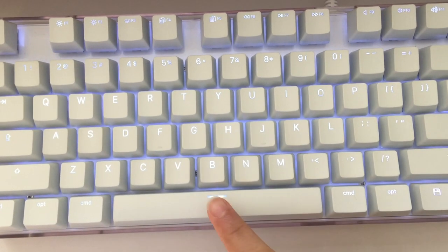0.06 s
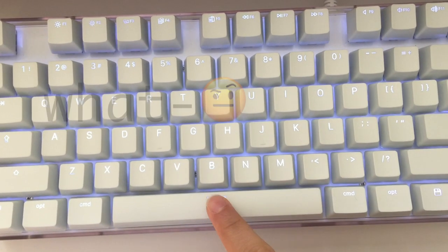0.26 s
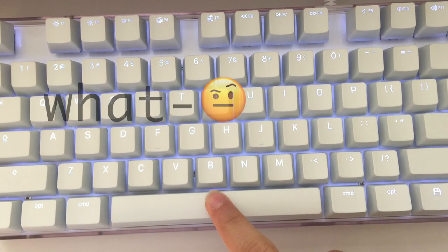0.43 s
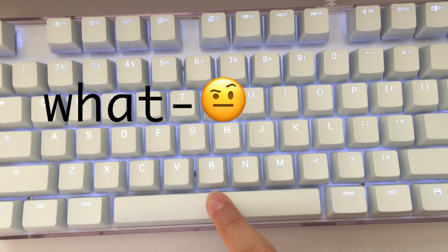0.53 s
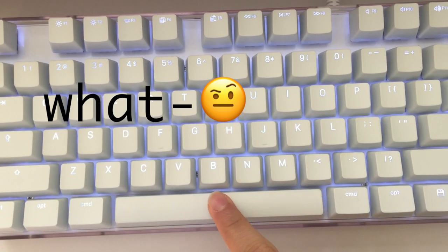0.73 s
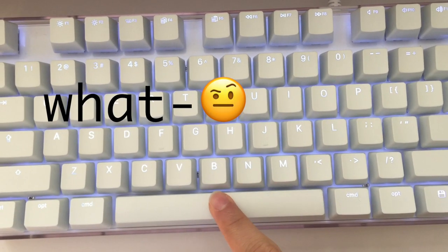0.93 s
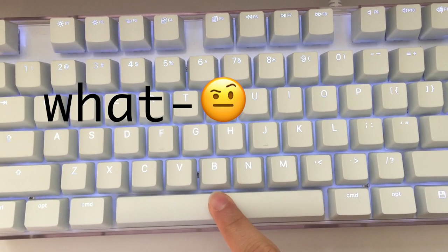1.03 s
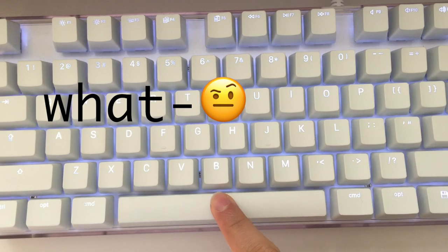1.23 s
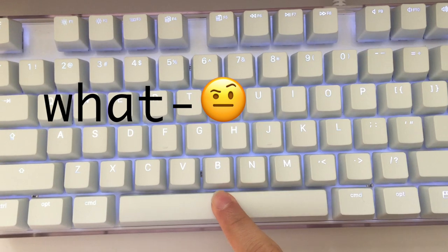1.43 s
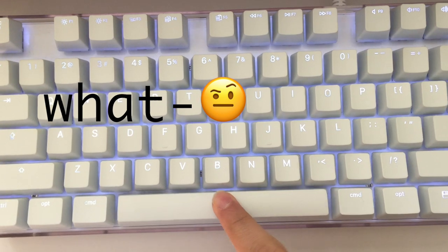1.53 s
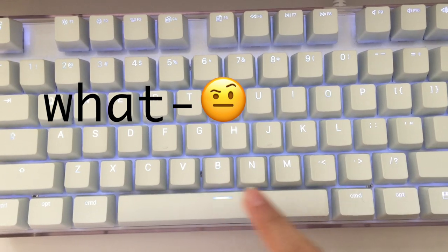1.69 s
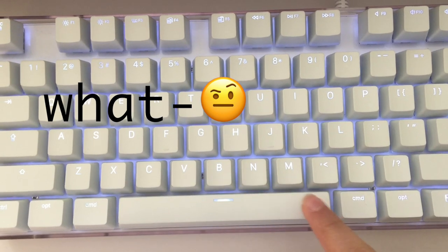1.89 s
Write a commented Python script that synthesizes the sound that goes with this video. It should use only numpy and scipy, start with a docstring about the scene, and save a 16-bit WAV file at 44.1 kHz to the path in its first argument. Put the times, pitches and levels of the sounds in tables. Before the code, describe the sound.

Soft plastic clacks of a mechanical spacebar pressed and released over and over, close by.

```python
"""A low room hum, then a light plastic rattle: close by, a finger taps a mechanical spacebar over and over.
Each tap rattles the loose cap, lands a low clack if the bar hits bottom, and springs back with a
brighter clack. Every hit is a burst of ringing plastic: damped noise bands plus the clear modes of
bar and case. The stem scrapes faintly as it travels, and the small room adds a short tail."""
import sys
import numpy as np
from scipy import signal
from scipy.fft import rfft, irfft
from scipy.io import wavfile

SR = 44100
rng = np.random.default_rng(int(sys.argv[2]) if len(sys.argv) > 2 else 0)


def unload_audio(sound):
    """Save the sound as a 16-bit wav file, at the path given as the first command line argument."""
    columns = np.transpose(np.atleast_2d(sound))
    # keep every value between -1 and 1, then stretch to whole-number steps
    steps = np.round(np.clip(columns, -1, 1) * 32767)
    wavfile.write(sys.argv[1], SR, steps.astype(np.int16))


N = 85995
T = np.arange(SR // 14) / SR  # time axis of one hit [s]
TOUCH, BOTTOM, RETURN = range(3)  # kinds of hit: each picks its level column in the resonance tables


def amp(db):
    """Decibels to gain."""
    return 10 ** (np.asarray(db) / 20)


def unit(x):
    """Scale to rms 1."""
    return x / np.sqrt(np.mean(x ** 2) + 1e-20)


def curve(points, hz):
    """Read (frequency, value) breakpoints on a log frequency axis."""
    freqs, values = np.transpose(points)
    return np.interp(np.log(hz + 1), np.log(freqs + 1), values)


def noise(gain, size):
    """Noise of rms 1, shaped by gain(hz)."""
    spectrum = rfft(rng.standard_normal(size))
    return unit(irfft(spectrum * gain(np.fft.rfftfreq(size, 1 / SR)), size))


def add(track, at, sound):
    """Drop a sound onto the track at a time in seconds."""
    part = track[max(round(at * SR), 0):][:len(sound)]
    part += sound[:len(part)]


def envelope(attack, hold, t60):
    """Rise, hold and exponential decay, all in seconds."""
    return (1 - np.exp(-(T / attack) ** 2)) * amp(-60 * np.maximum(T - hold, 0) / t60)


def tilt(brightness, hz):
    """Tilt EQ in dB, pivoting at 2 kHz; brightness is its slope in dB per octave."""
    return brightness * np.log2(np.clip(hz, 700, 8000) / 2000)


# Hum bands of the room: (centre [Hz], level [dB], width [Hz])
HUM_BANDS = [(55.7, -63.5, 5.9), (88.5, -76.5, 9.8), (137.9, -68.5, 3.85), (167.3, -69, 5)]
# Spectrum of the air bed: (frequency [Hz], relative level [dB])
AIR_SPECTRUM = [(15, -43), (28, -28), (38, -10), (48, 5.5), (70, -2.5), (90, -8.5), (115, -2.5),
                (150, -2.5), (200, -8.5), (270, -19.5), (500, -25.5), (900, -25.5), (1500, -25),
                (2600, -32.5), (5000, -36), (9000, -42), (14500, -43.5), (15500, -42)]
def room_tone():
    """The bed: narrow noise bands waver as a low hum over faint air."""
    hum = sum(amp(db) * noise(lambda f: 1 / (1 + (2 * (f - hz) / width) ** 4), N)
              for hz, db, width in HUM_BANDS)
    air = amp(-62.5) * noise(lambda f: amp(curve(AIR_SPECTRUM, f)), N)
    return hum + air


# Decay of the room's tail: (frequency [Hz], t60 [s])
TAIL_DECAY = [(200, 0.23), (1000, 0.28), (2500, 0.24), (6000, 0.15), (14000, 0.21)]
# Colour of the room's tail: (frequency [Hz], relative level [dB])
TAIL_COLOUR = [(200, 0.5), (700, 3), (1150, -2.5), (1700, -1), (2400, -1.5), (3200, -5), (6000, 3),
               (14000, -4.5)]
def room_reverb(source, tails):
    """Small-room reflections: the send crossfades through several short noise tails as the taps go on."""
    wet = np.zeros(N)
    for selector in np.eye(tails):
        hz, t, spectrum = signal.stft(rng.standard_normal(SR // 2), SR, nperseg=256)
        decay_db = 60 * t / curve(TAIL_DECAY, hz)[:, None]
        spectrum *= amp(curve(TAIL_COLOUR, hz)[:, None] - decay_db)
        tail = signal.istft(spectrum, SR, nperseg=256)[1]
        response = np.pad(tail / np.linalg.norm(tail), (SR // 200, 0))  # 5 ms pre-delay
        send = np.sqrt(np.interp(np.arange(N), np.linspace(0, N, tails), selector))
        wet += signal.fftconvolve(source * send, response)[:N]
    return wet


# Dense, damped resonances of the plastic:
# (centre [Hz], t60 [s], touch level [dB], bottom level [dB], return level [dB])
PLASTIC_BANDS = [(294, 0.041, -21, -25.5, -31), (410, 0.05, -20, -14.5, -17.5), (605, 0.041, -17, -16, -17),
                 (830, 0.047, -10.5, -12, -20.5), (1310, 0.051, -10.5, -8.5, -9.5),
                 (1827, 0.024, -5.5, -4, -5.5), (2480, 0.024, -5, -4.5, -5.5),
                 (3400, 0.015, -4.5, -11.5, -4), (4240, 0.016, -16.5, -13.5, -16),
                 (5930, 0.023, -23.5, -24, -21), (8240, 0.017, -25, -21.5, -22.5),
                 (14100, 0.014, -22, -22, -20.5)]
def plastic(shape, colour, kind):
    """Crowded resonances as noise bands, with the envelope shape(hz, t60) and the EQ colour(hz) in dB."""
    centres = [row[0] for row in PLASTIC_BANDS]
    out = np.zeros(len(T))
    for selector, (hz, t60, *levels) in zip(np.eye(len(centres)), PLASTIC_BANDS):
        env = shape(hz, t60)
        band = env * noise(lambda f: np.sqrt(np.interp(f, centres, selector, left=0)), len(T))
        out += unit(band) * np.sqrt(np.mean(env ** 2)) * amp(levels[kind] + colour(hz))
    return out


def scrape(length, growth_db, brightness=0):
    """A moment of friction on plastic, swelling or fading by growth_db over its length."""
    swell = amp(growth_db * np.minimum(T / length - 1, 0))
    return plastic(lambda hz, t60: swell * envelope(0.0014, length, t60),
                   lambda hz: tilt(brightness, hz), TOUCH)


# Clear modes of bar and case:
# (frequency [Hz], t60 [s], touch level [dB], bottom level [dB], return level [dB])
BAR_MODES = [(443, 0.14, -23, -23, -19.5), (513, 0.056, -15.5, -20, -28), (1089, 0.037, -13, -16.5, -23.5),
             (1304.3, 0.067, -10, -10, -14), (1645, 0.031, -12, -1, -6), (1774, 0.017, -43, -0.5, -1),
             (2082, 0.027, 0.5, -10.5, -6), (2577, 0.03, -46, -6.5, -6.5), (2974, 0.027, -19, -17, -9),
             (2993, 0.015, -4.5, -3, -1), (3482, 0.035, -10.5, -7.5, -5), (3724, 0.011, 0.5, -31.5, -4),
             (4464, 0.015, -11.5, -20, -17.5)]
def hit(kind, brightness, attack, hold, ring_db, snap_db=0):
    """One impact: a burst in the plastic, the ring of bar and case, and the stem's short ping."""
    def colour(hz):
        return tilt(brightness, hz) + snap_db / (1 + (4630 / hz) ** 4)  # snap is a high shelf

    def burst(hz, t60):
        lag = 0.0017 * 1000 / hz  # low resonances build up later
        return envelope(attack + lag, hold + lag, t60)

    out = plastic(burst, colour, kind)
    modes = [(hz, t60, levels[kind] + ring_db) for hz, t60, *levels in BAR_MODES]
    stem_ping = (6916, 0.016, -18.5)
    for hz, t60, db in modes + [stem_ping]:
        cycles = hz * (1 + rng.normal(0, 0.0069)) * T + rng.random()  # slight detune on every hit
        gain = amp(db + colour(hz) + rng.normal(0, 1.9))
        out += gain * envelope(attack, hold, t60) * np.sin(2 * np.pi * cycles)
    return out


# Cap ticks under the finger: (time [s], level before cushioning [dB], brightness [dB/octave])
CAP_TICKS = [(0.203, -50.5, -1), (0.2091, -42, -3), (0.218, -42.5, 2.5), (0.3175, -39, 1), (.324, -42.5, 1),
             (.330, -43, -5), (.5035, -40.5, 6), (.506, -32.5, 0), (0.512, -43, -6), (0.581, -48, -3),
             (0.691, -47.5, 1.5), (0.6963, -39.5, 2.5), (0.8638, -57, 6), (0.871, -41, 0.5),
             (.876, -40.5, -1), (1.049, -38, 2.5), (1.053, -40.5, -5), (1.221, -42, -1), (1.230, -46.5, 1),
             (1.286, -51.5, -4), (1.414, -39, 2.5), (1.418, -39.5, 3.5), (1.423, -42.5, 4.5),
             (1.483, -49, -2), (1.6241, -43.5, 2), (1.6276, -36.5, 2), (1.631, -38, -0.5)]
def cap_rattle():
    """Skin brushes the loose cap, it ticks against stem and stabiliser, and the stem scrapes down."""
    brush_s, sink_s, firm_db = 0.012, 0.031, -35.5
    out = np.zeros(N)
    for at, db, brightness in CAP_TICKS:
        add(out, at - brush_s, amp(db - 15.5) * scrape(brush_s, growth_db=12, brightness=2.5))
        cushion = amp(0.45 * (firm_db - db))  # the fingertip slows and softens lighter touches
        tick = hit(TOUCH, brightness, attack=0.0013 * cushion, hold=0.0007 * cushion, ring_db=-0.5)
        add(out, at, amp(db) / cushion ** 0.22 * tick)
        add(out, at, amp(db - 25) * scrape(sink_s, growth_db=-5.5))
    return out


# Downstroke clacks:
# (time [s], level [dB], brightness [dB/octave], relative case ring [dB], treble snap [dB])
BOTTOM_CLACKS = [(.228, -50.5, -8.5, -19, -4), (0.3432, -32.5, -3.5, 2.5, 9), (0.5302, -31, -1.5, -8, 7),
                 (0.7137, -30.5, -1, 4, 0), (1.0585, -42.5, -3.5, 1, 10.5), (1.2409, -34.5, -2, 2.5, 4.5),
                 (1.4347, -31, 1, 2, -17), (1.6411, -27, 0.5, 0.5, -4), (1.664, -50, 3, -21, 1)]
def bottom_out():
    """The bar hits bottom with a low clack that sets the hollow case ringing."""
    case_hz = 1162
    case_ring = envelope(attack=0.0028, hold=0.003, t60=0.038) * np.sin(2 * np.pi * case_hz * T)
    out = np.zeros(N)
    for at, db, brightness, case_db, snap_db in BOTTOM_CLACKS:
        clack = hit(BOTTOM, brightness, attack=0.00085, hold=0.0019, ring_db=-1.5, snap_db=snap_db)
        add(out, at, amp(db) * (clack + amp(case_db) * case_ring))
    return out


# Upstroke clacks: (time [s], first end level [dB], gap [s], second end level [dB],
# brightness [dB/octave], treble snap [dB], plate thump level [dB])
RETURN_CLACKS = [(0.4099, -41, .0044, -34, -0.5, 6.5, -42.5), (0.595, -32.5, 0.0072, -49, 2.5, -3, -49),
                 (0.7739, -47.5, 0.0038, -33.5, 2.5, -1.5, -65),
                 (0.9465, -34, 0.0045, -47.5, 4.5, -11.5, -47.5), (1.1213, -37.5, .003, -36, 0.3, 1, -44),
                 (1.3024, -38.5, 0.004, -37.5, 0, 1, -59), (1.4936, -36, 0.0031, -35, 0, -0.5, -76)]
def spring_back():
    """The stem slides up, the bar's ends strike their stops in turn, and the plate rebounds softly."""
    slide_s, thump_hz, thump_lag_s = 0.012, 373, 0.00595
    thump = envelope(attack=0.01, hold=0.01, t60=0.04) * np.sin(2 * np.pi * thump_hz * T)
    out = np.zeros(N)
    for at, first_db, gap, second_db, brightness, snap_db, thump_db in RETURN_CLACKS:
        slide = amp(max(first_db, second_db) - 14) * scrape(slide_s, growth_db=11.5)
        add(out, at - slide_s, slide)
        for strike_at, db in (at, first_db), (at + gap, second_db):
            clack = hit(RETURN, brightness, attack=0.0012, hold=0.0013, ring_db=-3, snap_db=snap_db)
            add(out, strike_at, amp(db) * clack)
        add(out, at + thump_lag_s, amp(thump_db) * thump)
    return out


def scene():
    """The mono mix: spacebar up front, a touch of reverb, room tone underneath."""
    low_cut = signal.butter(5, 309, "highpass", fs=SR, output="sos")  # the small case radiates no bass
    spacebar = signal.sosfilt(low_cut, cap_rattle() + bottom_out() + spring_back())
    reverb = amp(-18) * room_reverb(spacebar, tails=7)
    return (spacebar + reverb + room_tone())[None]


# Treble response of the microphone: (frequency [Hz], gain [dB])
MIC_EQ = [(3000, -0.5), (7700, -1.5), (8100, -3), (8800, 1.5), (9700, 3.5), (10200, -7), (11000, -4),
          (12000, 1.5), (13500, -0.5), (15300, -3.5), (16000, -3)]
def record(dry):
    """The microphone colours the top end, with a hard cut at 16.1 kHz."""
    hz = np.fft.rfftfreq(N, 1 / SR)
    return irfft(rfft(dry) * amp(curve(MIC_EQ, hz)) * (hz < 16100), N)


dry = scene()
out = record(dry)
unload_audio(out)
```